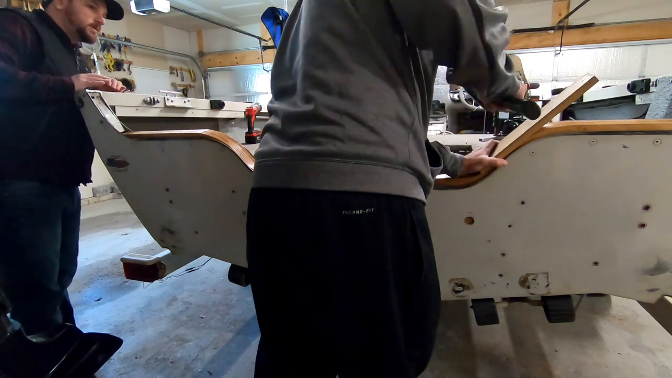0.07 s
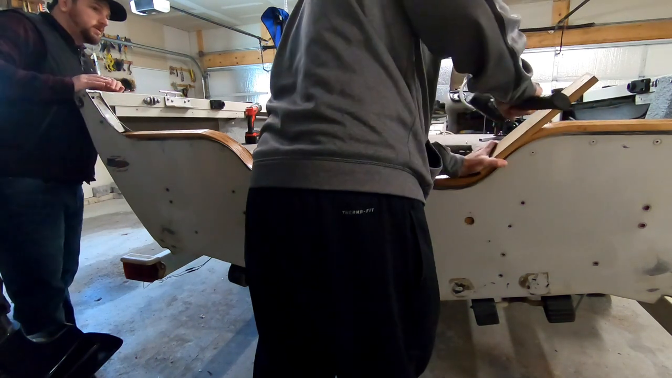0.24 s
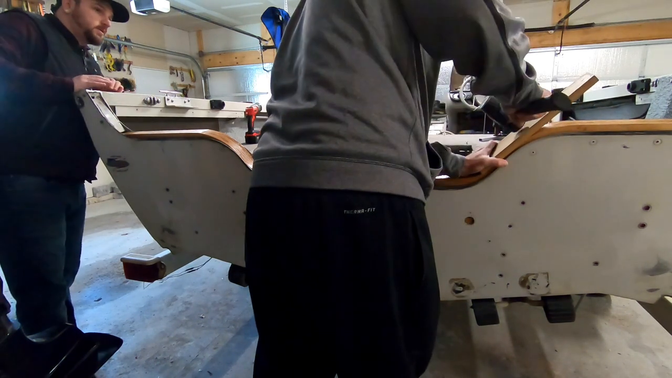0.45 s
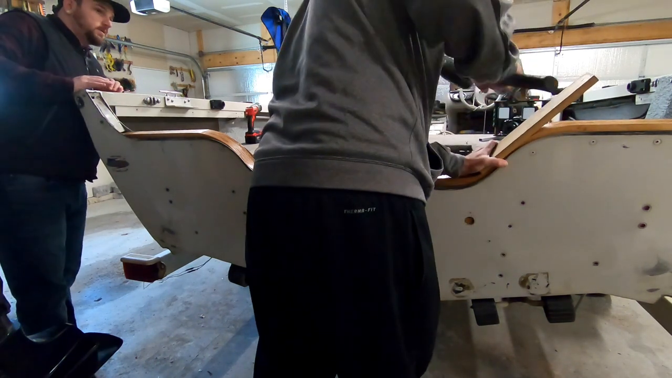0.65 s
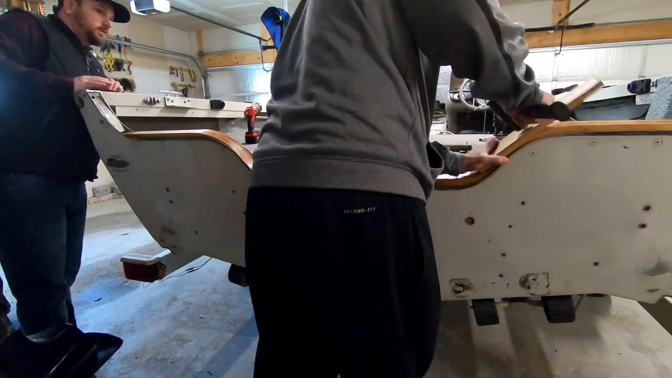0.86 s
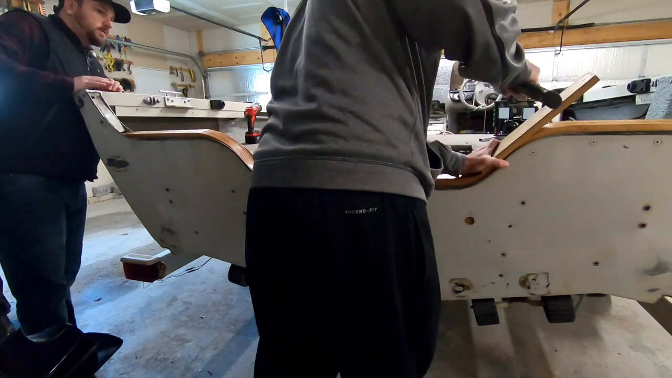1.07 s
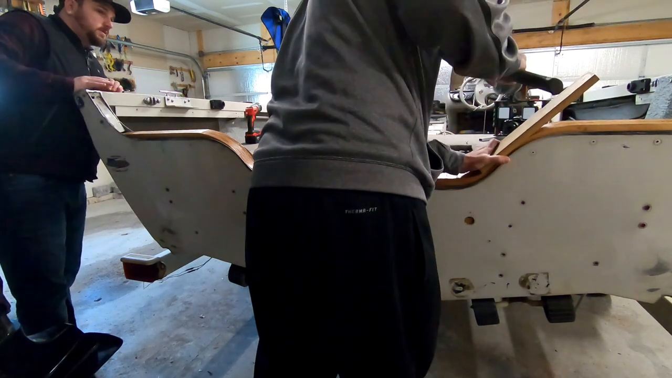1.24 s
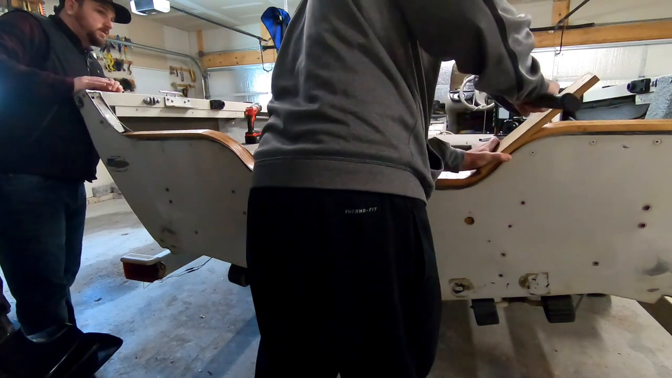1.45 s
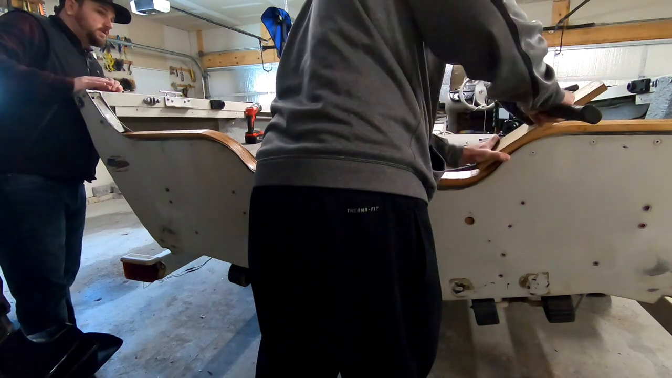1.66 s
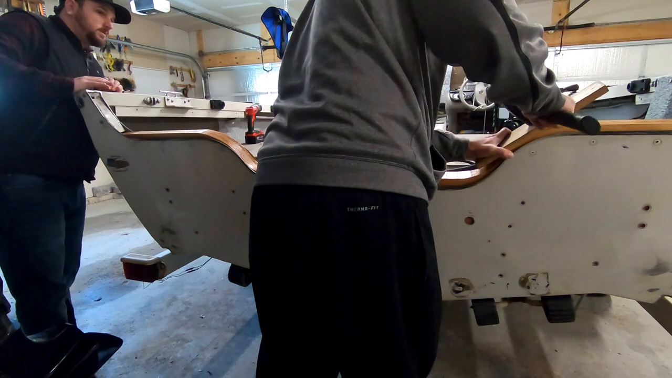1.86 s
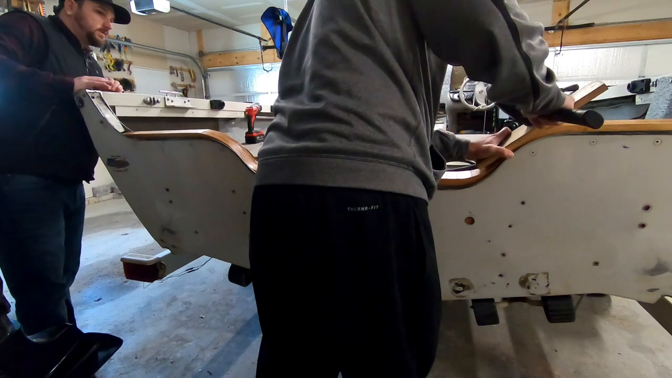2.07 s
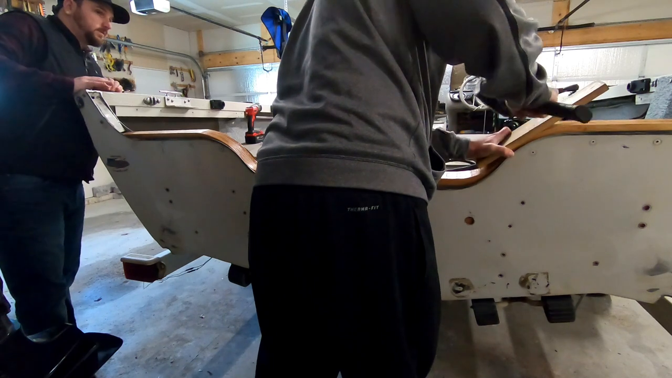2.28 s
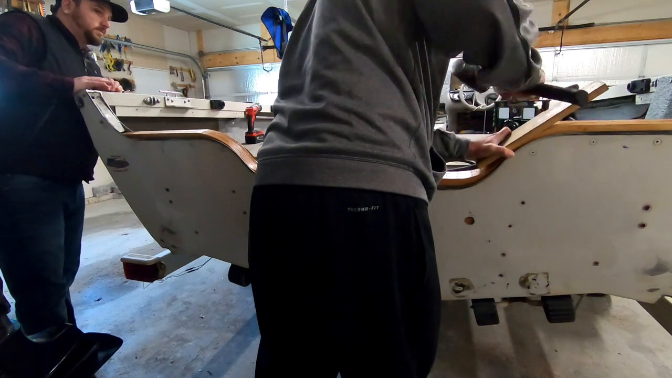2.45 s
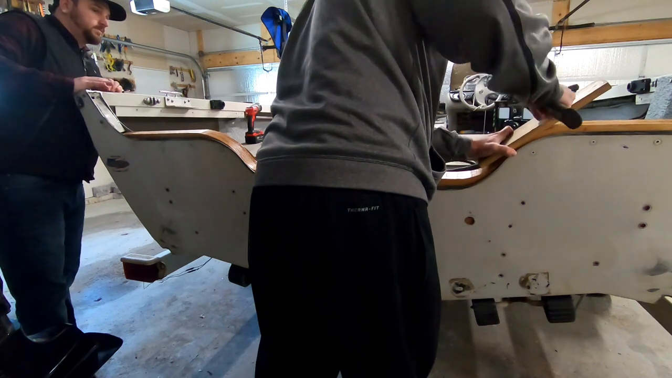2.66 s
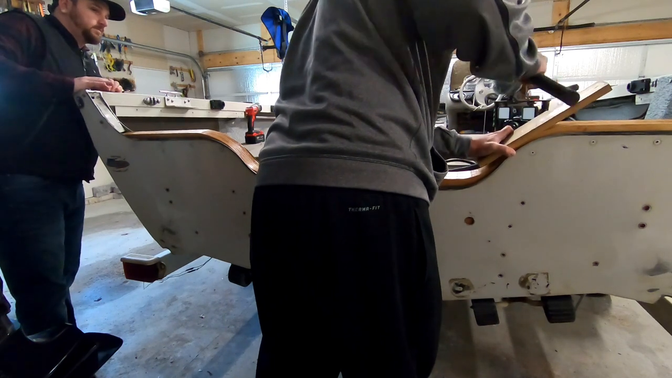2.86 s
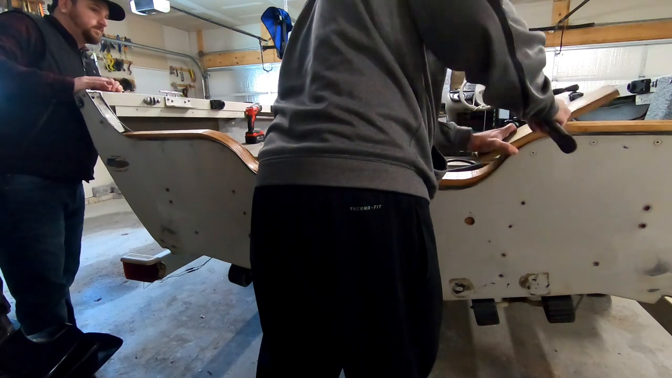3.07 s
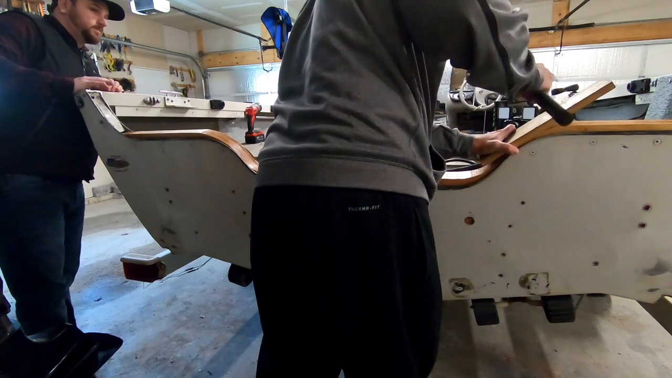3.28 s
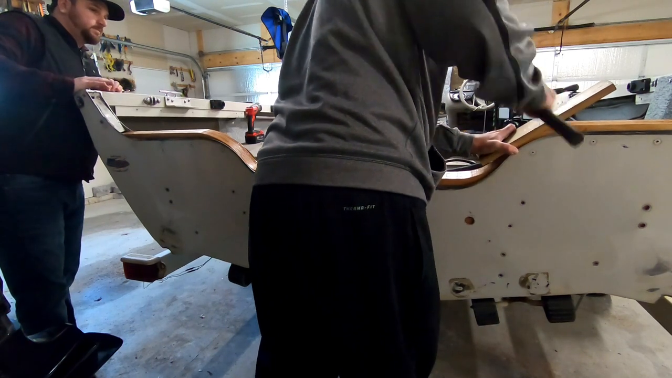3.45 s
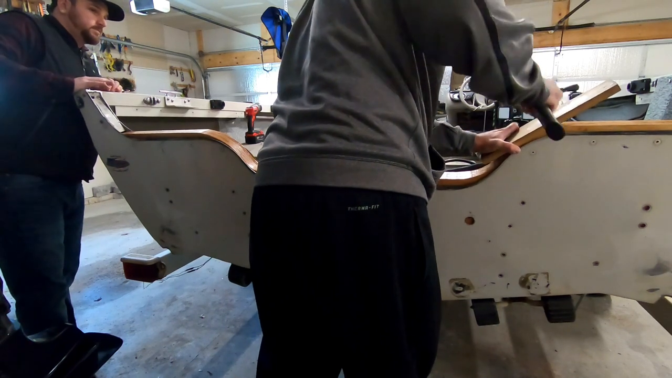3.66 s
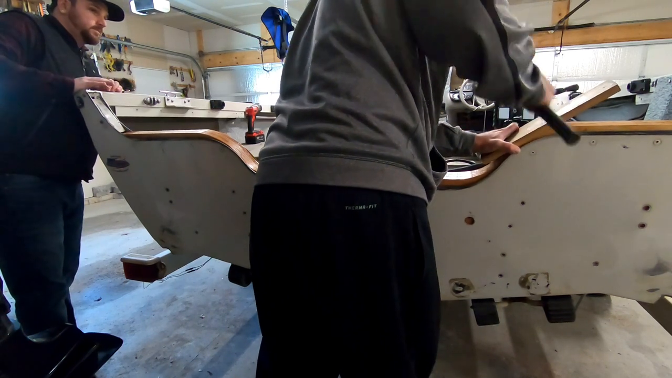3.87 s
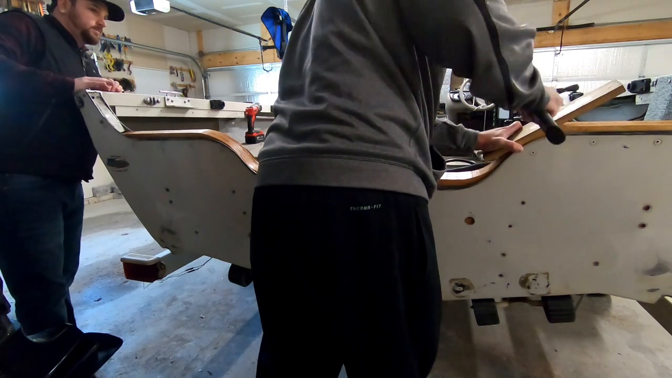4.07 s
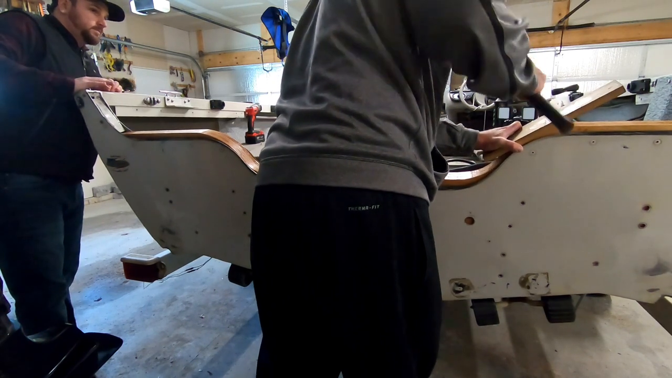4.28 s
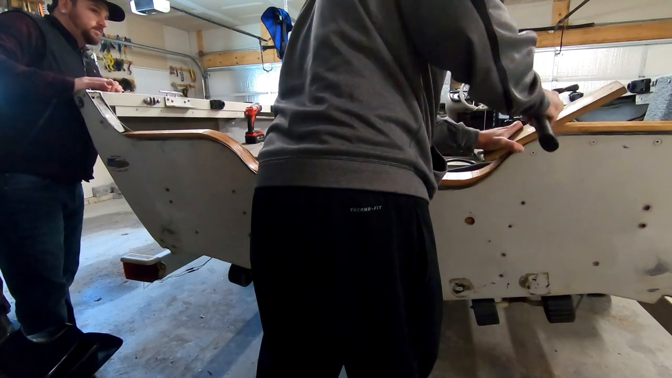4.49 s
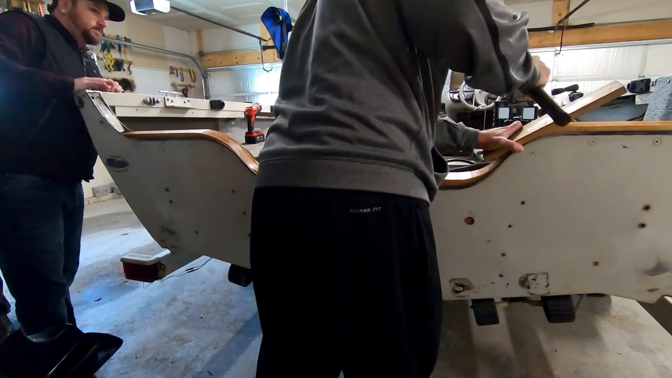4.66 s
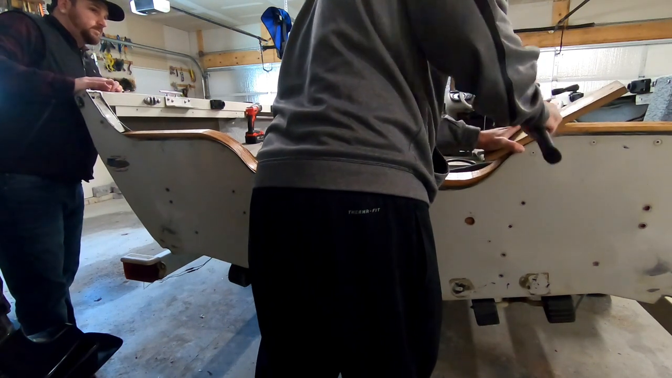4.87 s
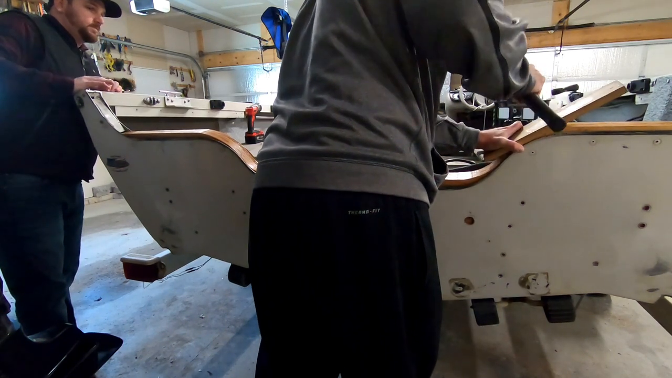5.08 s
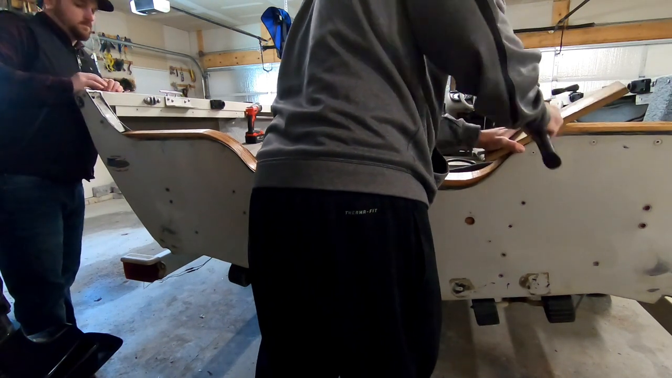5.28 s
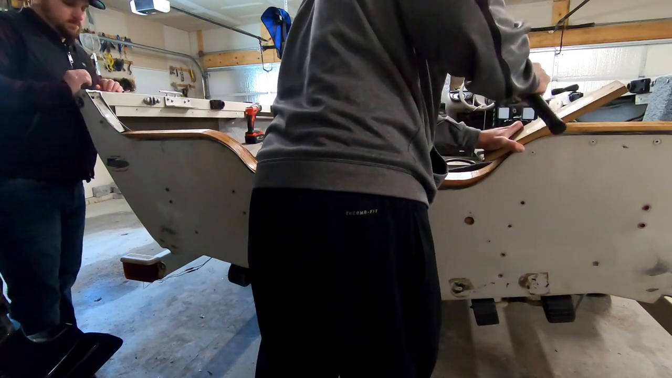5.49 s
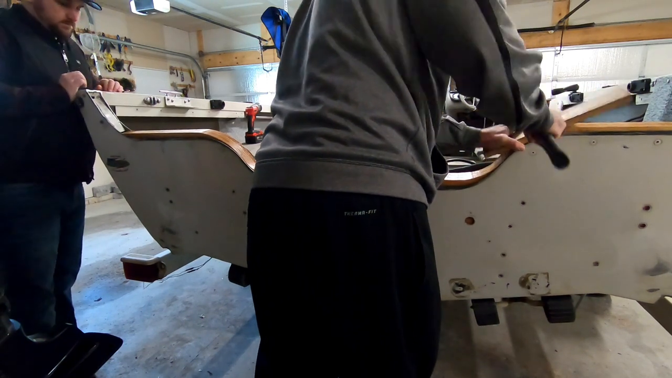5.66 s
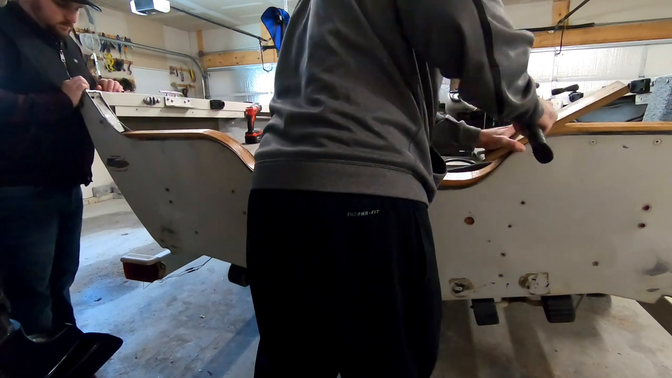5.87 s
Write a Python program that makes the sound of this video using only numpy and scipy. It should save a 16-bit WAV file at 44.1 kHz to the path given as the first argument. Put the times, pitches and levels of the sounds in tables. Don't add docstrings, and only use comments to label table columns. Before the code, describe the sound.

Loud overloaded hammer blows on board and hollow hull, first irregular, then regular, each rolling through a reverberant garage after brief cloth rustling.

```python
import sys
import numpy as np
from scipy import signal
from scipy.fft import rfft, irfft
from scipy.io import wavfile
from scipy.ndimage import uniform_filter1d

SR = 44100
rng = np.random.default_rng(int(sys.argv[2]) if len(sys.argv) > 2 else 0)


def digitize_waveform(pressure):
    field = np.atleast_2d(pressure).T
    bounded = np.clip(field, -1, 1)
    quanta = np.round(bounded * 32767).astype(np.int16)
    wavfile.write(sys.argv[1], SR, quanta)


def magnitude_from_level(level_db):
    exponent = np.asarray(level_db, float) / 20
    return 10 ** exponent


N = 261513
LEAD_S = 0.5
BLOW_DELAY_S = 0.0033

# start in seconds, strength in dB, hardness of the wood struck in dB,
# squareness of the steel face in dB, how well the blow fills the hall in dB.
BLOWS = [(0.43, -0.5, -21, -25.5, -2), (0.986, 3, -12, -22, -0.5), (1.681, -8.4, -38.5, -51, -9),
         (2.698, 0.5, -9, -18.5, -2.5), (3.165, -1.5, -10, -26, -1), (3.625, -2.5, -9.5, -18, -0.9),
         (4.057, -3, -10, -17.5, -0.7), (4.504, -4, -10.5, -17.5, -0.5), (4.947, -4.5, -14, -26, -1.3),
         (5.376, -5.4, -15.5, -28.5, 0), (5.79, -0.5, -14.5, -32, 1.2)]
EARLIER_BLOW = (-1 / 5, -4.5, -23, -42.5, -3.5)


def shaped(x, table):
    hz, db = np.transpose(table)
    f = np.maximum(np.fft.rfftfreq(len(x), 1 / SR), 1)
    return irfft(rfft(x) * magnitude_from_level(np.interp(np.log(f), np.log(hz), db)), len(x))


def level(x, db):
    return x * magnitude_from_level(db) / np.sqrt(np.mean(x ** 2))


def band(x, hz, width_hz):
    edges = np.clip([hz - width_hz / 2, hz + width_hz / 2], 20, 0.45 * SR)
    return signal.sosfilt(signal.butter(2, edges, "bandpass", fs=SR, output="sos"), x)


def lowpass(x, order, hz):
    return signal.sosfilt(signal.butter(order, hz, fs=SR, output="sos"), x)


def decay(t, t60):
    return np.exp(-np.log(1000) * t / t60)


def curve(table, s):
    return np.interp(s, *np.transpose(table))


def rubs(size):
    # start in seconds, length in seconds, centre in Hz, width in Hz, level in dB.
    swells = [(0, 0.39, 1750, 200, -55), (0, 0.37, 3300, 3000, -55.5), (0.253, 0.088, 2700, 2010, -43.5),
              (0.308, .13, 2300, 1600, -43), (0.019, 0.17, 4250, 400, -61.5), (.17, .3, 4750, 596, -59.5),
              (0.051, .45, 890, 1210, -50.5), (0.258, .17, 5000, 7000, -56.5),
              (.42, 0.29, 5250, 400, -58.5), (.66, .32, 4800, 400, -66), (1.632, 0.043, 6000, 8000, -62),
              (1.86, 0.066, 4500, 5000, -62), (1.959, 0.034, 4030, 5000, -63),
              (2.127, .15, 3400, 2000, -66.5), (2.4, .25, 800, 900, -68), (1.742, 0.24, 3820, 2970, -62.5),
              (2.619, .008, 5000, 9830, -53.5), (5.65, .05, 6000, 4970, -67)]
    rocks = [(2.075 + k * 0.094, 0.035, 200, 110, -47 - 2.5 * k) for k in range(3)]
    out = np.zeros(size)
    for s, length, hz, width_hz, db in swells + rocks:
        count = min(int(length * SR), SR // 2)
        noise, roughness = rng.standard_normal((2, count))
        grain = noise * magnitude_from_level(20 * uniform_filter1d(roughness, size=150))
        start = int((s + LEAD_S) * SR)
        out[start:start + count] += level(band(grain, hz, width_hz), db) * np.sqrt(np.hanning(count))
    return out


def hall():
    # band in Hz, level in dB, t60 in seconds.
    tail_bands = [(40.2, -9, 0.89), (56, -15, 0.9), (112, -26, 0.62), (154, -11.5, 0.41),
                  (234.5, -28.5, 0.81), (513, -14.5, 0.67), (1000, -22.5, 0.66), (2019, -20.5, 0.79),
                  (4230, -29.5, 0.71), (6000, -25, 0.48), (8950, -31, .35), (13900, -28.5, .2)]
    hz, db, t60 = np.transpose(tail_bands)
    t = np.arange(int(1.6 * SR)) / SR
    out = np.zeros(len(t))
    for f in 35 * 2 ** np.arange(0, 9, 0.5):
        band_db = np.interp(np.log(f), np.log(hz), db)
        band_t60 = np.interp(np.log(f), np.log(hz), t60)
        fade = decay(t, band_t60) * (1 - np.exp(-t / 0.003))
        out += magnitude_from_level(band_db - 10.5) * fade * band(rng.standard_normal(len(t)), f, 0.37 * f)
    return out


def walls():
    # delay in seconds, level in dB, treble limit in Hz.
    reflections = [(.007, -13, 6000), (.014, -9.5, 2620), (.022, -14, 1500), (.033, -7, 800),
                   (.066, -10.5, 2500), (.103, -7.5, 1180), (.112, -28.5, 1000), (.198, -35, 1500)]
    far_from_s = 0.05
    t = np.arange(SR // 3) / SR
    out = np.zeros((2, len(t)))
    for delay, wall_db, top_hz in reflections:
        late = np.maximum(t - delay, 0)
        smear = late * np.exp(-late / (0.001 + 0.035 * delay)) * rng.standard_normal(len(t))
        smear /= np.sqrt(np.sum(smear ** 2))
        out[int(delay > far_from_s)] += magnitude_from_level(wall_db) * band(smear, top_hz / 2, top_hz)
    out[0, 0] += 1
    return out


def room():
    # frequency in Hz, level in dB per Hz.
    room_colour = [(12, -30.5), (20, 4), (38, -0.5), (113, -8), (141, -3.5), (191, -16.5), (493, -22),
                   (688, -16), (1110, -24), (1930, -27.5), (4100, -36), (9450, -43), (15600, -46)]
    return level(shaped(rng.standard_normal(N), room_colour), -56)


def sway(size):
    # frequency in Hz, level in dB, t60 in seconds.
    spring_modes = [(26, -32.5, 3.4), (33, -32, 2.8), (49, -33, 2.5), (58, -34, 2.3)]
    rise_s, sway_per_db = 0.11, 0.33
    hz, mode_db, t60 = np.transpose(spring_modes)[:, :, None]
    t = np.arange(2 * SR) / SR
    out = np.zeros(size + 2 * SR)
    for s, db, *_ in [EARLIER_BLOW, *BLOWS]:
        chance = rng.standard_normal((2, len(spring_modes), 1))
        strength = magnitude_from_level(mode_db + sway_per_db * db + 2.2 * chance[0])
        swing = strength * np.sin(2 * np.pi * hz * (1 + 0.04 * chance[1]) * t)
        start = int((s + LEAD_S) * SR)
        out[start:start + len(t)] += (1 - np.exp(-t / rise_s)) * np.sum(swing * decay(t, t60), axis=0)
    return out[:size]


def ring(modes, t, scatter_db, detune):
    hz, db, t60 = np.transpose(modes)[:, :, None]
    chance = rng.standard_normal((2, len(modes), 1))
    fade = decay(t, np.clip(t60, 0.003, 0.4))
    sign = (-1) ** np.arange(len(modes))[:, None]
    strength = sign * magnitude_from_level(db + scatter_db * chance[0])
    tone = np.sin(2 * np.pi * hz * (1 + detune * chance[1]) * t)
    return np.sum(strength * fade * tone, axis=0)


def contact(knock_db, snap_db, crack_db, muffle_db, size=1024):
    # centre in Hz, width in Hz, level in dB.
    knock = [(1000, 890, -1.5), (1500, 720, 1), (1640, 90, 5.5), (1770, 2160, -7)]
    snap = [(2944, 550, 4), (3030, 130, 7), (3565, 1750, 1), (4500, 3160, -8)]
    crack = [(6000, 1500, -1.7), (10300, 7800, -1.5)]
    f = np.fft.rfftfreq(size, 1 / SR)
    power = 1e-9
    for peaks, group_db in [(knock, knock_db), (snap, snap_db), (crack, crack_db)]:
        shift = 1 + 0.02 * rng.standard_normal()
        for hz, width_hz, db in peaks:
            rim_ring = width_hz < 200
            peak = magnitude_from_level(2 * (db + group_db - muffle_db * rim_ring))
            power = power + peak / (1 + (2 * (f - hz * shift) / width_hz) ** 2) ** 2
    cepstrum = irfft(np.log(power) / 2)
    cepstrum[1:size // 2] *= 2
    cepstrum[size // 2 + 1:] = 0
    return irfft(np.exp(rfft(cepstrum)))


def chatter(t, knock_db, snap_db, crack_db):
    low, middle, high = rng.standard_normal((3, len(t)))
    out = magnitude_from_level(snap_db + 17.5) * band(middle * np.exp(-(t / 0.0034) ** 2), 2585, 3200)
    out += magnitude_from_level(crack_db + 14) * band(high * np.exp(-t / 0.0013), 9900, 11000)
    out += magnitude_from_level(knock_db + 13.5) * band(low * np.exp(-(t / 0.004) ** 2), 1300, 960)
    return out


def hammer(size):
    # frequency in Hz, level in dB, t60 in seconds.
    board_modes = [(53.7, -10, 0.08), (91, -4.5, .09), (130, 1.2, 0.055), (178.4, -.8, 0.06),
                   (228, -3, 0.052), (301.6, -2.5, 0.04), (358, .3, 0.05), (465, -2, 0.025),
                   (658.4, -8, .04), (723, -7, 0.025), (1090, -19, 0.035)]
    edge_modes = [(188, -4.5, 0.027), (398, .8, 0.04), (538, -9, 0.018), (800, -8, 0.014)]
    seated_modes = [(490.4, -1.5, .045), (720, -7, 0.02)]
    steel_modes = [(9350, -47.5, .15), (11300, -44, .3)]
    # time in seconds, level in dB.
    looseness = [(0, 2.5), (1, -2.5), (1.7, -.6), (2.6, -11), (3.3, -13.5), (5, -6), (5.9, -5)]
    # time in seconds, level in dB.
    tightness = [(3, -19), (4.2, -12), (4.5, -1.5), (5.9, -1.5)]
    out, t = np.zeros((3, size + SR)), np.arange(SR // 2) / SR
    swell = 1 - np.exp(-t / 0.0049)
    for s, db, snap_db, crack_db, fill_db in [EARLIER_BLOW, *BLOWS]:
        knock_db = max(snap_db + 3.5, -12.5)
        tight_db = curve(tightness, s)
        blow = swell * ring(board_modes, t, 1.5, 0.015)
        blow += magnitude_from_level(curve(looseness, s)) * ring(edge_modes, t, 1, 0.02)
        blow += magnitude_from_level(tight_db) * ring(seated_modes, t, 1, 0.01)
        blow += magnitude_from_level(crack_db) * ring(steel_modes, t, 5, 0.003)

        muffle_db = 0.8 * max(tight_db + 12, 0)
        click = contact(knock_db + 36, snap_db + 34, crack_db + 31, muffle_db)
        dull_db = min(snap_db + 15.5, 0)
        blow[:len(click)] += lowpass(click, 3, 17000 * magnitude_from_level(0.63 * dull_db))

        rattle = rng.standard_normal(len(t)) * swell * np.exp(-t / 0.009)
        blow += magnitude_from_level(12 + 0.3 * dull_db) * band(rattle, 400, 400)

        rows = np.array([blow, magnitude_from_level(fill_db) * blow, chatter(t, knock_db, snap_db, crack_db)])
        start = int((s + BLOW_DELAY_S + LEAD_S) * SR)
        out[:, start:start + len(t)] += magnitude_from_level(db + 4.5) * rows
    return signal.sosfilt(signal.butter(2, 70, "highpass", fs=SR, output="sos"), out[:, :size])


def scene():
    lead = int(LEAD_S * SR)
    size = N + lead
    near = rubs(size)
    blows, filling, chattering = hammer(size)
    close, far = walls()
    tail = hall()
    tail[:len(far)] += far
    echoes = signal.fftconvolve(blows, close)[:size]
    rolling = signal.fftconvolve(filling + 0.5 * near, tail)[:size]
    heard = echoes + rolling + chattering + near + sway(size)
    return (heard[lead:] + room())[None]


def preamp_hiss(t):
    # time in seconds, level in dB.
    hiss_levels = [(0, -56), (.42, -59.5), (.44, -66.5), (5.93, -85.5)]
    return magnitude_from_level(curve(hiss_levels, t)) * band(rng.standard_normal(N), 8000, 17000)


def auto_gain(t):
    deepest_db, climb_db_per_s = 19.5, 113.5
    gain_db, ceiling = np.zeros(N), np.full(N, 0.45)
    for s, db, *_ in [EARLIER_BLOW, *BLOWS]:
        dive_db = np.clip(19.5 + 2 * db, 0, deepest_db)
        hold_s = 0.086 - 0.003 * dive_db
        since = np.maximum(t - s - BLOW_DELAY_S, 0)
        fall = 0.5 * (1 - np.exp(-since / 0.0014)) + 0.5 * np.clip((since - 0.03) / 0.0046, 0, 1)
        left_db = np.maximum(dive_db - climb_db_per_s * np.maximum(since - hold_s, 0), 0)
        gain_db = np.minimum(gain_db, -left_db * fall)
        ceiling += 0.32 * (t >= s) * np.exp(-(since / 0.005) ** 2)
    return gain_db, ceiling


def dropout(x, t):
    gap = (1.049, 1.073)
    present = np.clip(np.maximum(gap[0] - t, t - gap[1]) / 0.002, 0, 1)
    return present * x + (1 - present) * lowpass(x, 2, 60)


def top_cut(x):
    return signal.sosfilt(signal.butter(12, 17010, fs=SR, output="sos"), x)


def record(dry):
    t = np.arange(N) / SR
    gain_db, ceiling = auto_gain(t)
    x = (dry + preamp_hiss(t)) * magnitude_from_level(gain_db) / ceiling
    x = ceiling * x / (1 + np.abs(x) ** 4) ** 0.25
    x = dropout(x, t)
    x = signal.sosfilt(signal.butter(1, [25, 11000], "bandpass", fs=SR, output="sos"), x)
    x = lowpass(x, 8, 15900)
    return top_cut(x)


dry = scene()
out = record(dry)
digitize_waveform(out)
```